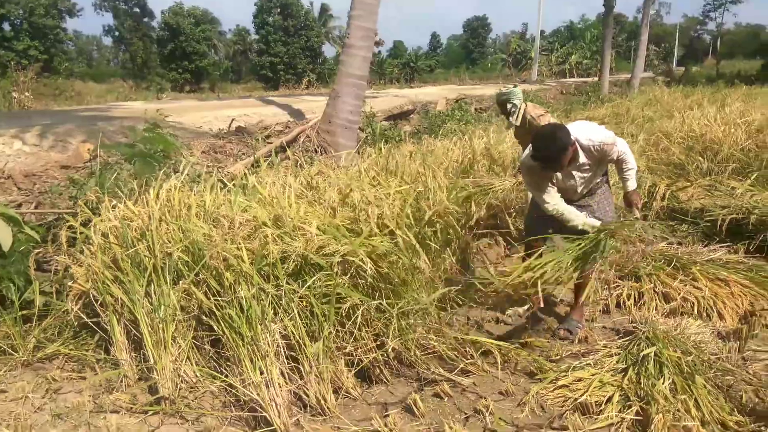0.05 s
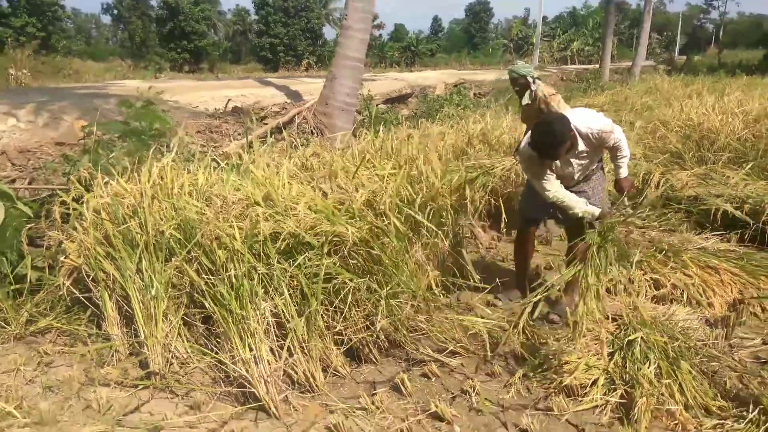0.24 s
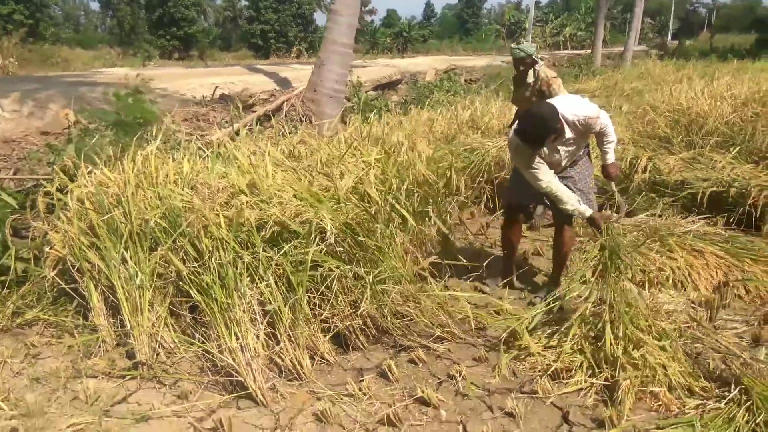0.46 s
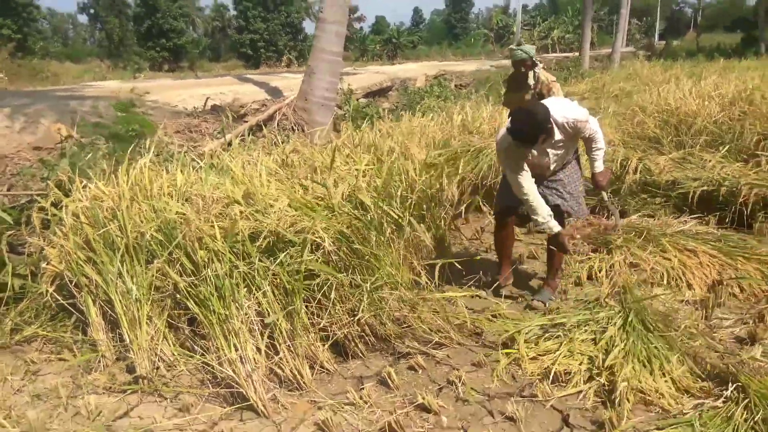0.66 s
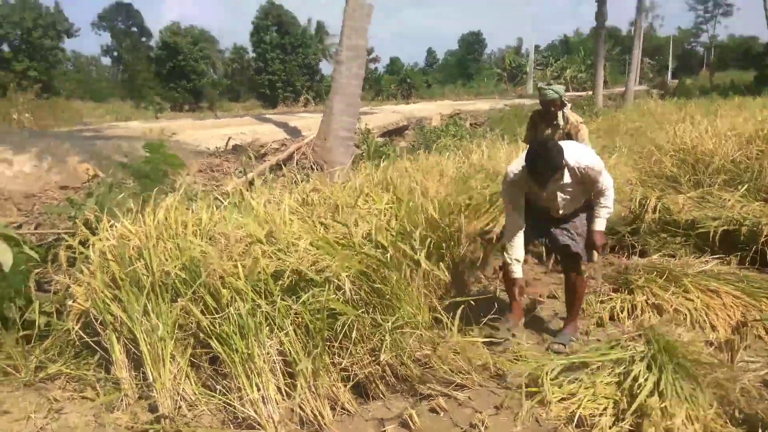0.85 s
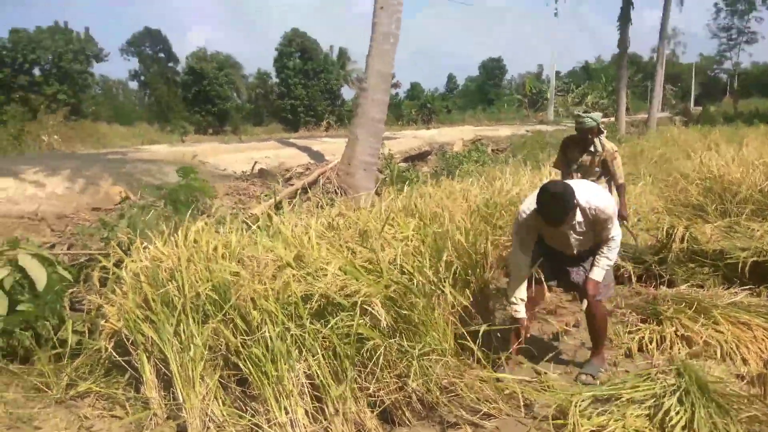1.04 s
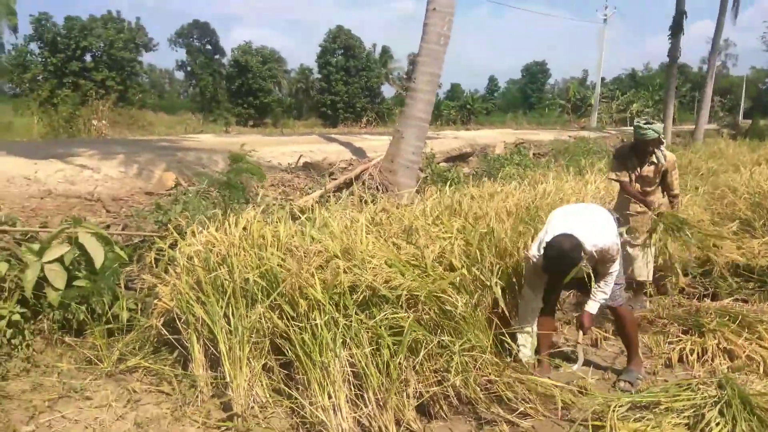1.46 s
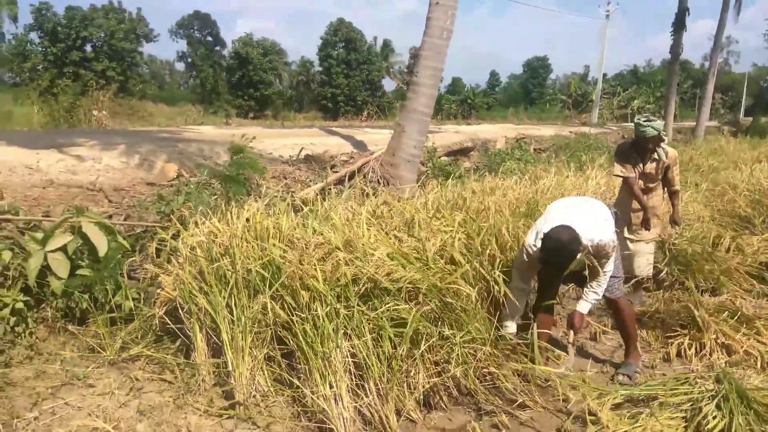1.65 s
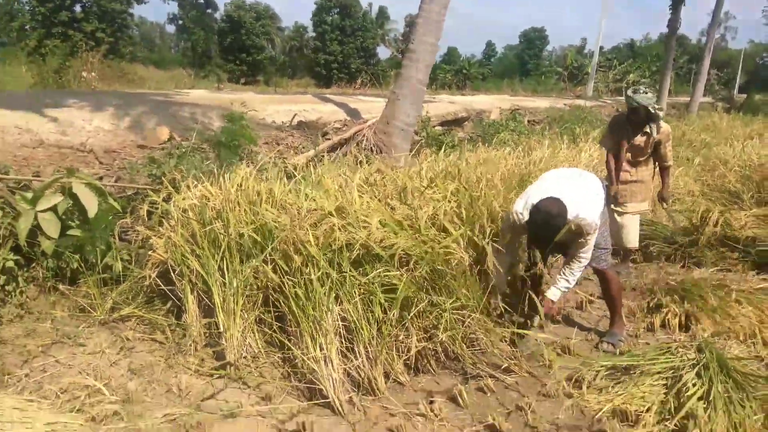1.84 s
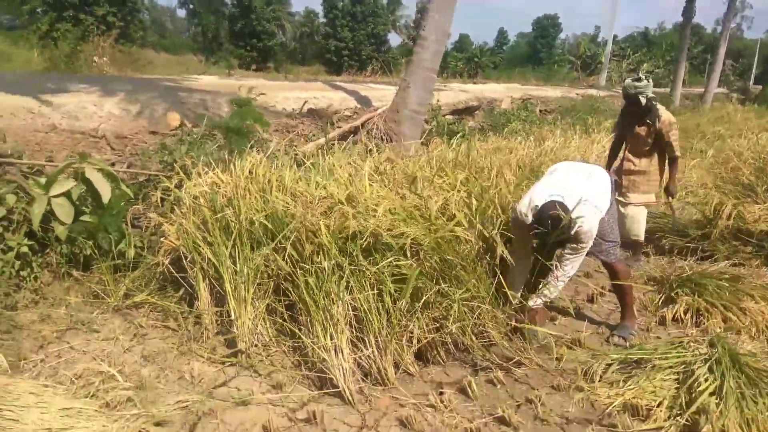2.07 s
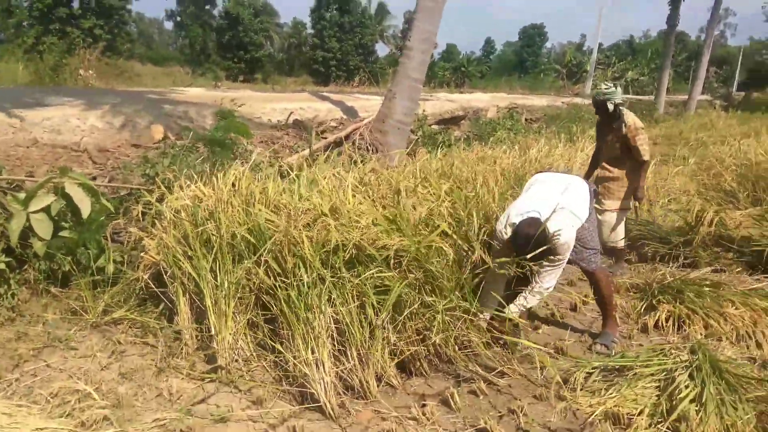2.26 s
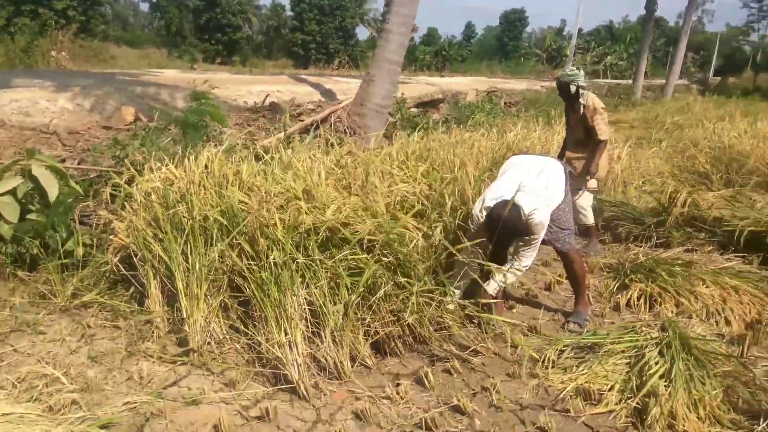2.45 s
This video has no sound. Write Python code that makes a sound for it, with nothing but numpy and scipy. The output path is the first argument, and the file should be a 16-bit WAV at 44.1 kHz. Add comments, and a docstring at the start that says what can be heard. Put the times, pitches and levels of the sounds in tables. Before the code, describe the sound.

Dry rice stalks rustle as they are handled, then crackle and tear under a sickle.

```python
"""Harvesting rice by hand

In an open field, a cut bundle is swung down onto the stubble, and two sharp ticks follow. The next
handful is gathered, its dry leaves rustling as they rub together. Then a sickle rips through it:
stalk after stalk cracks and tears, making blade and straw ring. Light wind buffets the microphone
with a low rumble and dies away before the cut."""
import sys
import numpy as np
from scipy import signal
from scipy.fft import rfft, irfft, next_fast_len
from scipy.io import wavfile
from scipy.ndimage import uniform_filter1d

SR = 44100
rng = np.random.default_rng(int(sys.argv[2]) if len(sys.argv) > 2 else 0)


def generate_wav(sig):
    """Save sig (samples, or channels by samples) to the path in sys.argv[1] as 16-bit PCM at SR."""
    pcm = np.round(np.clip(np.atleast_2d(sig).T, -1, 1) * 32767).astype(np.int16)
    wavfile.write(sys.argv[1], SR, pcm)


N = 110250
TIME = np.arange(N) / SR

# Tone of the field's faint background (a tone table makes pitches stronger or weaker): pitch_hz, gain_db
FIELD_TONE = [(25, -15.5), (95, 6.5), (300, 1.5), (800, 2.5), (1500, -0.5), (2500, -1.5), (4000, -9.5),
              (6000, -12), (7200, -14), (8000, -32), (10000, -20)]
# Wind on the microphone: time_s, level_db
WIND_LEVEL = [(0, -67.5), (.03, -51), (.17, -60), (.25, -46.5), (.3, -49.5), (.35, -44.5), (.43, -54.5),
              (.48, -42.5), (.6, -50.5), (.645, -47.5), (.7, -59.5), (.74, -52.5), (.78, -44),
              (.835, -40.5), (.86, -49.5), (.91, -44), (1.01, -61), (1.1, -48), (1.2, -51), (1.24, -51),
              (1.27, -49), (1.32, -60), (1.44, -59), (1.48, -53), (1.575, -49), (1.65, -78.5), (1.76, -84),
              (1.82, -60), (2.0, -86), (2.5, -73.5)]
# Its low rumble: pitch_hz, gain_db
WIND_TONE = [(20, -47), (38, -39.5), (50, -24), (65, -9), (85, 0), (150, 2), (220, -2), (320, -9),
             (450, -19), (650, -33), (1000, -35), (2500, -80)]
# Single puffs of air: peak_time_s, level_db, width_s, pitch_hz
PUFFS = [(0.028, -48.5, 0.004, 233), (0.485, -43.5, 0.026, 175), (0.747, -43.5, 0.006, 126),
         (0.781, -34.5, 0.0055, 180), (0.827, -36.5, 0.0083, 191), (.896, -43.5, 0.0033, 200),
         (1.134, -30, 0.012, 122), (1.18, -34, 0.0084, 235), (1.205, -38.5, 0.0039, 81),
         (1.371, -42, 0.0066, 120), (1.519, -48.5, 0.053, 113.4), (1.57, -49, 0.0097, 133),
         (1.846, -43, 0.0028, 174), (2.151, -61, 0.016, 74)]
# Small swirls of air, as loud as a strong gust would make them: time_s, level_db
SWIRL_LEVEL = [(0, -51.5), (.33, -43.5), (.5, -52.5), (.76, -54), (.82, -68), (1.13, -50.5), (1.55, -70),
               (1.85, -50), (2.5, -55)]
# Their tone, higher than the rumble: pitch_hz, gain_db
SWIRL_TONE = [(100, -24), (220, -8), (320, -1), (450, -7.5), (600, -12), (800, -34), (2000, -76.5)]

# The bundle is swung and laid down: time_s, level_db
LAYING_LEVEL = [(0, -65), (.018, -68.5), (.03, -63), (.07, -59.5), (.17, -60), (.22, -53), (.26, -54),
                (.35, -54.5), (.41, -59), (.45, -57), (.49, -59.5), (.56, -65), (.66, -65.5), (.78, -67.5),
                (.95, -75), (1.05, -80)]
# Its tone: pitch_hz, gain_db
LAYING_TONE = [(200, -11), (600, -4.5), (900, 5), (1200, -2), (1550, 5), (1850, -0.5), (2250, 8),
               (2600, -2.5), (2850, 5), (3100, -3), (3520, 1.5), (3800, -3.5), (4170, 5), (4650, 1),
               (5000, -1.5), (5500, -3.5), (5950, 1), (6250, -7), (7000, -7), (7900, -36), (9000, -31.5),
               (10000, -41)]
# Leaves slide over one another: start_s, level_db, rise_s, hold_s, fall_s
LEAF_SWISHES = [(0.178, -59, 0.016, 0.046, 0.22), (0.5, -57.5, 0.022, 0.019, 0.092),
                (1.019, -55.5, 0.11, 0.28, 0.15), (1.733, -60, 0.097, 0.38, 0.17)]
# Their tone: pitch_hz, gain_db
SWISH_TONE = [(400, -10), (1000, -15.5), (1400, -4), (1950, 0.5), (2400, -6.5), (3300, -3.5), (4300, -17.5),
              (5100, -15), (5600, 5), (5950, -4.5), (6350, 9), (6700, -0.5), (7100, -4.5), (7900, -24.5),
              (8900, -19), (10000, -27)]
# The next handful is drawn together: time_s, level_db
GATHERING_LEVEL = [(1.03, -83), (1.09, -63.5), (1.2, -61.5), (1.26, -58), (1.32, -53.5), (1.39, -55.5),
                   (1.45, -47), (1.5, -52.5), (1.55, -54), (1.6, -60.5), (1.65, -67.5), (1.7, -64),
                   (1.76, -73.5), (1.85, -88)]
# Its tone: pitch_hz, gain_db
GATHERING_TONE = [(200, -21.5), (750, -1), (1050, -6.5), (1400, -1), (1700, -8), (2000, 5), (2300, -8),
                  (2800, -1), (3150, -8.5), (3600, -2), (3980, 6), (4200, 1.5), (4430, -3), (4720, 4),
                  (5100, -4), (5450, 4.5), (5950, 2.5), (6500, -2.5), (7150, -5), (7900, -24.5),
                  (8900, -25), (10000, -18)]
# The handful is held tight, cut free and lifted: time_s, level_db
PULLING_LEVEL = [(1.72, -74.5), (1.81, -57.5), (1.9, -57.5), (2.05, -55), (2.19, -46.5), (2.225, -56),
                 (2.28, -52.5), (2.38, -54.5), (2.43, -52), (2.5, -50)]
# Its tone: pitch_hz, gain_db
PULLING_TONE = [(200, -7), (700, -7.5), (1050, 1), (1350, -11.5), (1700, -5), (1980, 6), (2300, -3.5),
                (2700, -5), (3080, -6.5), (3450, 3.5), (3800, -2), (4280, 5.5), (4600, 0.5), (5000, 2),
                (5700, 1), (6500, 4.5), (7250, -2), (7900, -19.5), (8900, -11.5), (10000, -47.5)]
# Dry straw knocks, before their tone is shaped: start_s, level_db, fade_s, dull_above_hz
STRAW_KNOCKS = [(0.022, -55.5, 0.033, 4020), (0.458, -37.5, 0.0023, 5060), (0.5251, -32.5, 0.00089, 2200),
                (0.5457, -43.5, 0.0028, 1380), (0.704, -52, 0.019, 2320), (0.813, -61.5, 0.041, 1310),
                (1.12, -52, 0.014, 2600), (1.729, -53, 0.0047, 1500)]
# Their tone: pitch_hz, gain_db
KNOCK_TONE = [(200, -3.5), (700, 7.5), (1100, 11.5), (1600, 8), (2150, 13.5), (2700, 9), (3250, 15.5),
              (4000, 1.5), (4700, 13.5), (5400, -11), (7000, -23), (10000, -35)]
# Sharp chirping ticks: peak_time_s, level_db, pitch_hz, rise_s, fade_s
SHARP_TICKS = [(0.5246, -24, 6110, 0.00035, 0.0006), (0.5467, -25, 6070, 0.000093, 0.00064)]

# Stalks part under the blade: start_s, level_db, fade_s, extra_woody_db, extra_bright_db
STALK_SNAPS = [(1.909, -46, 0.0024, -16, 10), (1.913, -41, 0.0073, -17, 10), (1.934, -44, 0.0061, -1.5, -4),
               (1.970, -46.5, 0.011, 5, 0.5), (1.979, -47, 0.0054, -11, -3), (2.028, -46.5, 0.0027, -3, 8),
               (2.071, -36.5, 0.0053, -11, 6), (2.083, -39, 0.014, -16, 0), (2.099, -40.5, 0.004, 5, -13),
               (2.111, -37.5, 0.011, -5, -2.5), (2.124, -40.5, 0.0092, 3, 7),
               (2.132, -41.5, 0.0042, 12.5, 7), (2.141, -38.5, 0.0043, 17, -11),
               (2.15, -39.5, 0.0088, -4, -2), (2.158, -35.5, 0.0029, 0, -8), (2.171, -36.5, 0.01, 10.5, 10),
               (2.179, -37, 0.0049, 5, 3.5), (2.185, -44, 0.0019, 10, -10), (2.406, -41, 0.0025, -5, -1),
               (2.426, -44, .003, 0, 6)]
# Pitches at which blade and stalks ring: pitch_hz, width_hz, gain_db
BLADE_RINGS = [(730, 100, -16), (1134, 243, -1.5), (1625, 170, -3.5), (1823, 97, 2.5), (1937, 140, 3.5),
               (2520, 600, -12), (3460, 290, 2), (3620, 270, 0.5), (4120, 220, -1.5), (5220, 530, -2),
               (5930, 300, -4.5), (6360, 290, 3.5), (6400, 280, -14), (9300, 900, -20)]
# Tone of the whole cut: pitch_hz, gain_db
CUT_TONE = [(100, 3.5), (2000, 0), (7200, -2), (7900, -15), (9000, -10.5), (10000, -16.5)]
# Narrow dips and two small lifts in the tone of all the straw sounds: pitch_hz, width_hz, gain_db
STRAW_DIPS = [(1345, 130, -3.5), (1668, 110, -7), (2222, 130, -7), (3150, 240, -3), (3700, 26, 4),
              (4450, 500, -2.5), (5140, 200, -2), (6500, 170, 1.5), (6500, 310, -7)]
# How far the rustle spreads to left and right: pitch_hz, spread_db
RUSTLE_SPREAD = [(1000, -75), (3600, -65), (4600, -28), (5600, -17), (7000, -13), (9000, -7)]
# The cut comes from one spot, so only its highest pitches spread: pitch_hz, spread_db
CUT_SPREAD = [(1000, -75), (5000, -55), (7000, -32), (8000, -7), (9000, -6)]

LEFT_RIGHT = np.array([[1], [-1]])  # adds a sound on the left and subtracts it on the right


def from_db(db):
    """Turns decibels into a number to multiply by."""
    return 10 ** (np.asarray(db) / 20)


def unit_level(x):
    """Scales a sound so that its average (RMS) level is 1."""
    return x / np.sqrt(np.mean(x ** 2) + 1e-20)


def evened(x, samples):
    """Holds the level near 1 over every stretch of this many samples."""
    return x / np.sqrt(np.abs(uniform_filter1d(x * x, samples)) + 1e-12)


def level_curve(rows):
    """Joins (time_s, level_db) points; silent outside them, unless they end near the scene's edge."""
    times, db = np.transpose(rows)
    before_db = db[0] if times[0] < .1 else -120
    after_db = db[-1] if times[-1] > 2.4 else -120
    return from_db(np.interp(TIME, times, db, left=before_db, right=after_db))


def stroke(start_s, level_db, rise_s, hold_s, fall_s):
    """A loudness shape that rises, holds and falls in straight lines."""
    corners = start_s + np.cumsum([0, rise_s, hold_s, fall_s])
    return from_db(level_db) * np.interp(TIME, corners, [0, 1, 1, 0])


def burst(start_s, level_db, fade_s, rise_s):
    """A loudness shape that jumps up and dies away."""
    rise = np.clip((TIME - start_s) / rise_s, 0, 1)
    fade = np.exp(-np.clip((TIME - start_s - rise_s) / fade_s, 0, 40))
    return from_db(level_db) * rise * fade


def wobble(rate_hz):
    """A smooth random wander, about 1 in size; a higher rate moves faster."""
    step, warm_up = 40, 2000  # one value every 40 samples; the first 2000 values are skipped
    pole = np.exp(-2 * np.pi * step * rate_hz / SR)
    noise = rng.standard_normal(N // step + warm_up + 2)
    slow = signal.lfilter([1], [1, -2 * pole, pole * pole], noise)[warm_up:]
    return np.interp(np.arange(N) / step, np.arange(len(slow)), unit_level(slow))


def shape_tone(x, table):
    """Filters a sound through (pitch_hz, gain_db) points."""
    size = 2 * next_fast_len(N)
    hz, db = np.transpose(table)
    bins_hz = np.maximum(np.arange(size // 2 + 1) * SR / size, 1)
    gains = from_db(np.interp(np.log(bins_hz), np.log(hz), db))
    # These steps make the filter ring only after a sound, never before it (minimum phase).
    cepstrum = irfft(np.log(gains))
    cepstrum[1:size // 2] *= 2
    cepstrum[size // 2 + 1:] = 0
    return irfft(rfft(x, size) * np.exp(rfft(cepstrum)))[:N]


def resonate(x, hz, width_hz):
    """Lets a sound ring around one pitch and weakens the rest."""
    pole = np.exp(-np.pi * width_hz / SR)
    feedback = [1, -2 * pole * np.cos(2 * np.pi * hz / SR), pole * pole]
    return signal.lfilter(np.array([1, 0, -1]) * (1 - pole * pole) / 2, feedback, x)


def keep_range(x, kind, hz, order):
    """Keeps the lows, the highs or a band; a higher order cuts more steeply."""
    return signal.sosfilt(signal.butter(order, hz, kind, fs=SR, output="sos"), x)


def cut_top(x, hz):
    """Turns everything above this pitch down by at least 60 dB."""
    return signal.sosfilt(signal.cheby2(14, 60, hz, fs=SR, output="sos"), x)


def add_dips(x):
    """Gives the straw sounds their shared, slightly hollow tone."""
    for hz, width_hz, db in STRAW_DIPS:
        x = x - (1 - from_db(db)) * resonate(x, hz, width_hz)
    return x


def open_field(level_db=-68.5):
    """The faint, steady hush of the field."""
    return from_db(level_db) * unit_level(shape_tone(rng.standard_normal(N), FIELD_TONE))


def wind(flutter_db=3.5, strong_gust_db=-38, swirl_growth=0.76):
    """Rough air flutters and puffs on the microphone; strong gusts shed small, higher-pitched swirls."""
    gust = level_curve(WIND_LEVEL) * from_db(flutter_db * np.tanh(wobble(rate_hz=64)))
    rumble = gust * evened(shape_tone(rng.standard_normal(N), WIND_TONE), samples=900)
    for peak_s, db, width_s, hz in PUFFS:
        swell = from_db(db) * np.exp(-.5 * ((TIME - peak_s) / width_s) ** 2)
        width_hz = 0.58 * hz
        air = resonate(resonate(rng.standard_normal(N), hz, width_hz), hz, width_hz)
        rumble += swell * evened(air, samples=600)
        gust = np.hypot(gust, swell)  # each puff adds to the gust's strength
    swirls = evened(shape_tone(rng.standard_normal(N), SWIRL_TONE), samples=600)
    swirls *= level_curve(SWIRL_LEVEL) * (gust / from_db(strong_gust_db)) ** swirl_growth
    return keep_range(rumble + swirls, "band", hz=[51, 634], order=4)


def fibre_clicks(clicks_per_s=9000):
    """Dry fibres touch in thousands of tiny clicks of uneven size."""
    sizes_db = np.minimum(rng.exponential(1, N), 5)
    clicks = from_db(sizes_db) * rng.choice([-1, 1], N)
    return unit_level(clicks * (rng.random(N) < clicks_per_s / SR))


def rustle(loudness, tone, cracks_per_s=66, crack_db=11.5, flicker_db=2.55):
    """Rubbing straw: a flickering bed of tiny clicks, with lone leaf cracks standing out."""
    cracks = from_db(crack_db) * (rng.random(N) < cracks_per_s / SR) * rng.uniform(-2.4, 0.92, N)
    flicker = from_db(flicker_db * np.tanh(wobble(rate_hz=31)))
    rubbing = shape_tone(fibre_clicks() + cracks, tone)
    return loudness * flicker * evened(rubbing, samples=1500)


def handled_straw():
    """Straw rustles as the bundle is laid down, leaves slide and a handful is gathered and pulled."""
    laying = rustle(level_curve(LAYING_LEVEL), LAYING_TONE)
    sliding = rustle(sum(stroke(*row) for row in LEAF_SWISHES), SWISH_TONE)
    gathering = rustle(level_curve(GATHERING_LEVEL), GATHERING_TONE)
    pulling = rustle(level_curve(PULLING_LEVEL), PULLING_TONE)
    return laying + sliding + gathering + pulling


def straw_knocks():
    """Dry straw knocks and cracks in short bursts, some crisp and some dull."""
    out = np.zeros(N)
    for start_s, db, fade_s, dull_hz in STRAW_KNOCKS:
        crack = evened(fibre_clicks(), samples=40) * burst(start_s, db, fade_s, rise_s=0.000098)
        out += keep_range(crack, "low", dull_hz, order=2)
    return shape_tone(out, KNOCK_TONE)


def ticks(drop_hz_per_s=440000, overtone_hz=9530, overtone_db=-26.5, rounding_s=0.00025):
    """Two very short, high pings that drop in pitch."""
    out = np.zeros(N)
    for peak_s, db, hz, rise_s, fade_s in SHARP_TICKS:
        t = np.clip(TIME - peak_s, -.02, .02)
        from_peak_s = np.hypot(t, rounding_s) - rounding_s  # rounds off the sharp tip
        loudness = from_db(db) * np.exp(-from_peak_s / np.where(t < 0, rise_s, fade_s))
        chirp = np.sin(2 * np.pi * (hz - .5 * drop_hz_per_s * t) * t)
        overtone = from_db(overtone_db) * np.sin(2 * np.pi * overtone_hz * t)
        out += loudness * (chirp + overtone)
    return out


def blade_ring(x, woody_db=0, bright_db=0, detune=0, scatter_db=0.5):
    """Blade and stalk ring at several pitches, whose tuning and strength can vary from stalk to stalk."""
    out = 0
    for hz, width_hz, db in BLADE_RINGS:
        db += woody_db * np.interp(hz, (1150, 1900), [1, 0])  # low rings give the woody body
        db += bright_db * np.interp(hz, (4000, 6000), [0, 1])  # high rings give the bright edge
        pitch_shift, level_shift = rng.uniform(-1.2, 1, 2)
        ring = resonate(x, hz * (1 + detune * pitch_shift), width_hz)
        out = out + from_db(db + scatter_db * level_shift) * ring
    return out


def sickle_cut(crack_above_tear_db=12):
    """The sickle saws through the handful; each stalk cracks, then its fibres tear."""
    fibres = evened(fibre_clicks(), samples=100)
    sawing = stroke(start_s=2.075, level_db=-46, rise_s=.06, hold_s=.051, fall_s=.012)
    out = sawing * unit_level(blade_ring(fibre_clicks()))
    for start_s, db, fade_s, woody_db, bright_db in STALK_SNAPS:
        span = slice(int(start_s * SR), int((start_s + .1) * SR))
        loudness = burst(start_s, db, fade_s, rise_s=0.00123)[span]
        tear = fibres[span] * loudness
        tear[np.argmax(loudness)] += from_db(db + crack_above_tear_db)  # the crack is one spike
        snap = blade_ring(tear, woody_db, bright_db, detune=0.016)
        out[span] += unit_level(snap) * np.sqrt(np.mean(loudness ** 2))
    return shape_tone(out, CUT_TONE)


def scene():
    """Everything sits in the middle; only the highs of the rustle and the cut spread to the sides."""
    leaves = add_dips(handled_straw())
    sickle = add_dips(sickle_cut())
    field = open_field()
    side = (shape_tone(leaves, RUSTLE_SPREAD) + shape_tone(sickle, CUT_SPREAD)) * wobble(rate_hz=400)
    middle = field + leaves + add_dips(straw_knocks()) + ticks() + wind() + sickle
    return middle + side * LEFT_RIGHT


def record(dry, hiss_db=-91.5, side_gain_db=-3.5):
    """The microphone loses the highest pitches; the recorder adds faint hiss, wide only in the highs."""
    middle, side = from_db(hiss_db) * rng.standard_normal((2, N))
    side = from_db(side_gain_db) * keep_range(side, "high", hz=4500, order=6)
    hiss = middle + side * LEFT_RIGHT
    return cut_top(cut_top(dry, hz=10500) + hiss, hz=15200)


dry = scene()
out = record(dry)
generate_wav(out)
```